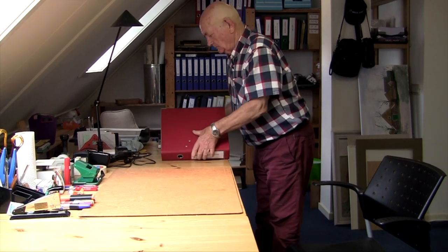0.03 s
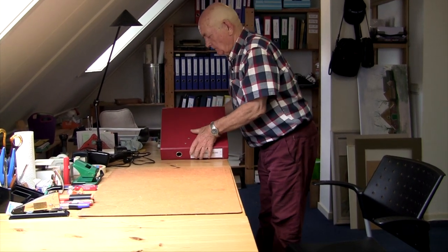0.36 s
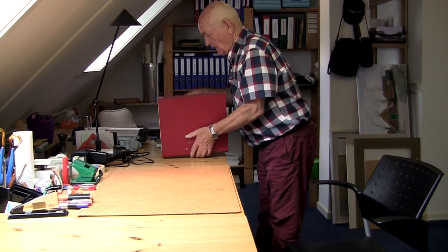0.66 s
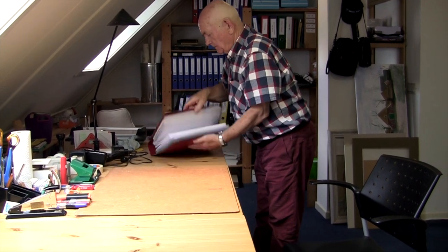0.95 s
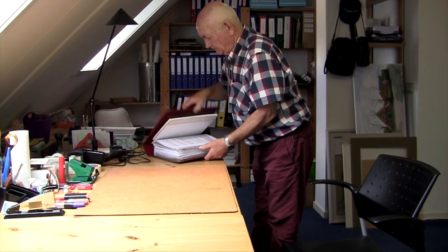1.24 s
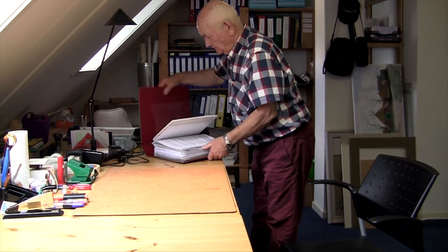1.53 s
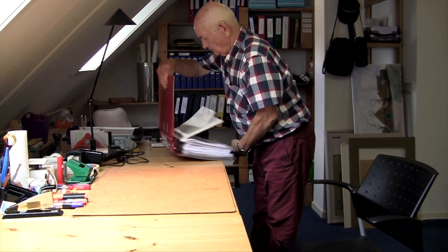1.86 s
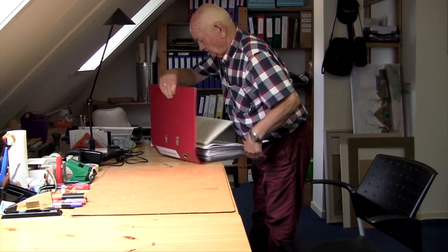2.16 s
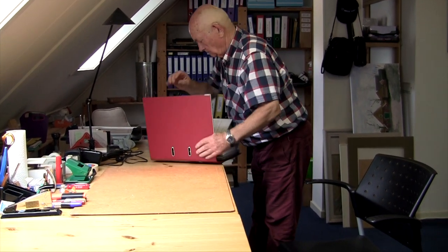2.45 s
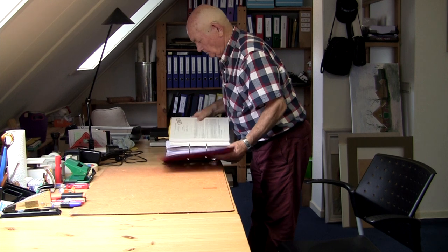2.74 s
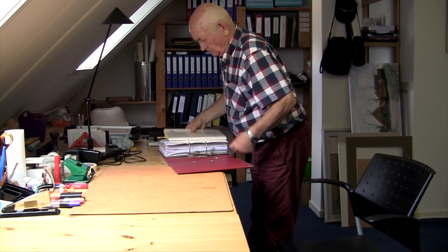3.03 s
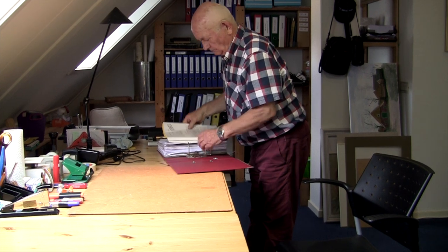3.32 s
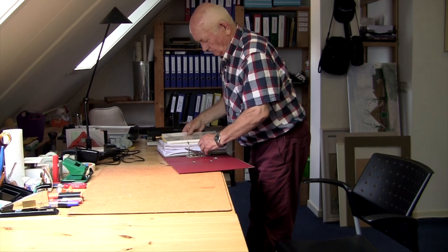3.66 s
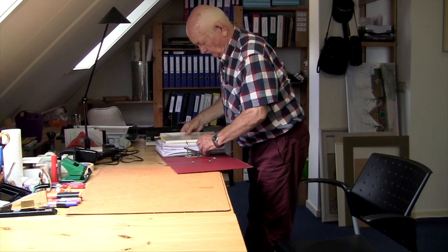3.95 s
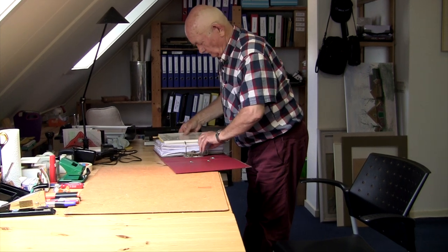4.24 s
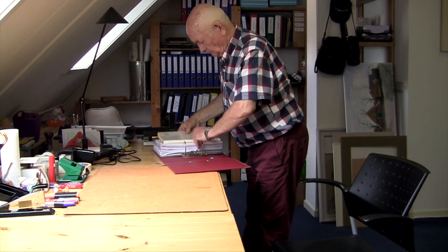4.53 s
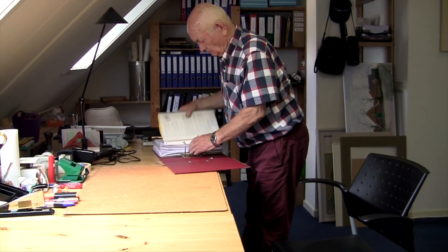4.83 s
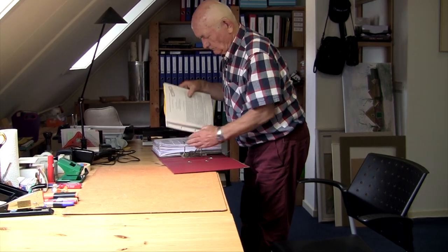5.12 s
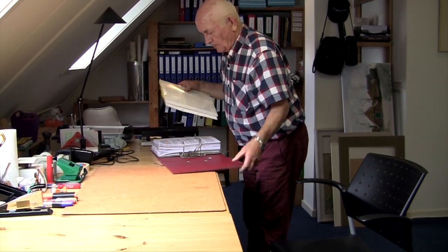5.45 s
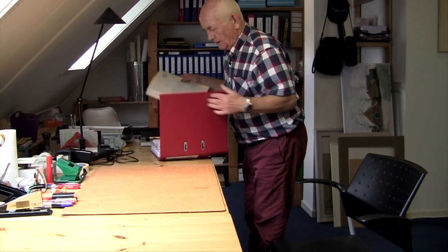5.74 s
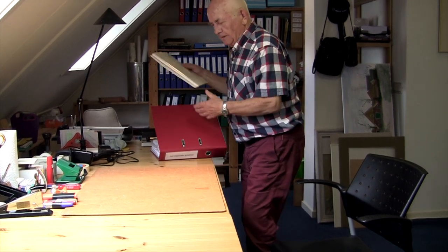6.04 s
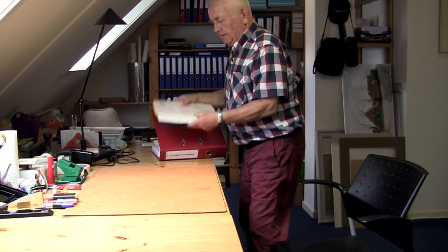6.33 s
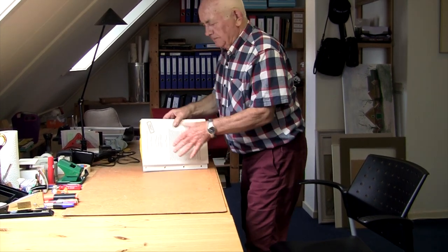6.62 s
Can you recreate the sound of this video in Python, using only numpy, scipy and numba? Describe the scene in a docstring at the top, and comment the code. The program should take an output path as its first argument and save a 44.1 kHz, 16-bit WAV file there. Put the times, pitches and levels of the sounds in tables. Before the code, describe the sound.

A full ring binder scrapes and tips onto a wooden table with a cluster of clacks and thumps. A sharp knock follows, then a quieter stretch of small metal clicks as the clamp and lever are released. Paper rustles, the cover falls shut with a hollow knock, and sheets are tapped on the table. The sound is nearly mono, with the short echo of a small room.

```python
"""Cardboard scrapes and paper hisses as a full ring binder is lifted and tipped onto a wooden table.
Its covers clack and thump the table top, its wire rings click, and sheets buckle in quick crackles.
The binder is opened, the sprung clamp and the steel lever snap free, and paper is stood on its edge.
Near the end the cover falls shut and the hollow binder rings. A small furnished room echoes it all."""
import sys
import numpy as np
from scipy import signal
from scipy.fft import rfft, irfft, next_fast_len
from scipy.io import wavfile
from scipy.ndimage import uniform_filter1d
from numba import njit

SR = 44100
rng = np.random.default_rng(int(sys.argv[2]) if len(sys.argv) > 2 else 0)


def to_wav(sig):
    """Store sig (one row per channel, or 1-D mono) as 16-bit WAV at the path in sys.argv[1].

    Samples outside -1..1 are clipped; the rate is SR.
    """
    pcm = np.clip(np.atleast_2d(sig), -1, 1) * 32767
    pcm = np.round(pcm).astype(np.int16)
    wavfile.write(sys.argv[1], SR, pcm.T)  # frames by channels


N = 303361


def undb(db):
    """Decibels to gain."""
    return 10 ** (np.asarray(db) / 20)


def clock(seconds):
    """Sample times in seconds."""
    return np.arange(int(seconds * SR)) / SR


def level(x, db, first_s=None):
    """Scale to an rms level, over the whole sound or its first moments."""
    head = x if first_s is None else x[:int(first_s * SR)]
    return x * undb(db) / np.sqrt(np.mean(head ** 2) + 1e-20)


def add(track, start_s, x):
    """Mix a sound into a track."""
    i = max(int(start_s * SR), 0)
    track[i:i + len(x)] += x[:max(N - i, 0)]


def band(x, lo_hz, hi_hz, order=2):
    """Causal band-pass."""
    return signal.sosfilt(signal.butter(order, [lo_hz, hi_hz], "band", fs=SR, output="sos"), x)


def colour(x, points):
    """Shape a spectrum by (Hz, dB) points."""
    hz, db = np.transpose(points)
    size = next_fast_len(len(x))
    bin_hz = np.arange(size // 2 + 1) * SR / size
    gain = undb(np.interp(np.log(bin_hz + 1), np.log(hz), db))
    return irfft(rfft(x, size) * gain, size)[:len(x)]


def fade(t, t60_s):
    """Exponential decay."""
    return undb(-60 * t / t60_s)


def mode(t, hz, t60_s):
    """One damped sine."""
    return np.sin(2 * np.pi * hz * t) * fade(t, t60_s)


def struck(modes, db):
    """A body rings in its own modes after a blow."""
    t = clock(0.3)
    ringing = sum(undb(mode_db) * mode(t, hz, t60_s) for hz, mode_db, t60_s in modes)
    return level(ringing, db, first_s=0.0062)


def wander(rate_hz):
    """Smooth random drift, spread near 1."""
    hold = int(SR / rate_hz)
    steps = np.repeat(rng.standard_normal(N // hold + 1), hold)
    return uniform_filter1d(steps, hold)[:N]


def grains(size, per_s, spread_db):
    """Tiny slips of fibres: random clicks, a few much bigger than the rest."""
    slips = (rng.random(size) < per_s / SR) * rng.standard_normal(size)
    return slips * undb(spread_db * np.minimum(rng.exponential(1, size), 4))


@njit
def resonate(x, hz, damping):
    """State-variable band-pass with a moving centre."""
    y, band_state, low_state = np.empty(len(x)), 0., 0.
    for i in range(len(x)):
        g = np.tan(np.pi * hz[i] / SR)
        passed = (band_state + g * (x[i] - low_state)) / (1 + g * (g + damping))
        band_state = 2 * passed - band_state
        low_state += 2 * g * passed
        y[i] = damping * passed
    return y


def stroke(start_s, length_s, rise_share=0.4, sag_db=-5.5):
    """Gain of one sliding stroke: it speeds up, slackens and dies away when the hand stops."""
    t = np.arange(N) / SR - start_s
    progress = np.clip(t / length_s, 0, 1)
    rise = np.sin(np.pi / 2 * np.minimum(progress / rise_share, 1)) ** 2
    release = fade(np.clip(t - length_s, 0, 1), t60_s=0.11)
    return rise * undb(sag_db * progress) * release


# Friction spectra. Each row: frequency in Hz, gain in dB.
SCRAPE_SPECTRUM = [(60, -19), (150, -5), (250, -3), (500, 4), (800, 6), (1400, -1), (2200, -3),
                   (3200, -9.5), (5000, -24), (9000, -88)]
HISS_SPECTRUM = [(800, -30), (2000, 8.5), (3200, 6), (5000, -2.5), (8000, -11.5), (12000, -34.5),
                 (16000, -46)]
# Sliding strokes. Each row: start in seconds, length in seconds, scrape gain in dB, hiss gain in dB,
# cover resonance in Hz.
STROKES = [(-0.08, 0.26, -37.5, -45.5, 1470), (0.432, 0.092, -36.5, -53, 1320),
           (0.487, 0.076, -26.5, -66, 1230), (0.594, .12, -34.5, -38.5, 1150), (0.698, .19, -33, -42, 1090),
           (0.912, 0.29, -26.5, -40, 940), (1.287, 0.11, -34, -40.5, 1120),
           (1.61, 0.34, -39.5, -43.5, 1360), (1.944, 0.08, -22, -35.5, 1330),
           (2.198, 0.065, -40, -44, 1560), (2.275, 0.084, -35.5, -38.5, 1660),
           (2.29, 0.27, -40.5, -44, 1570), (2.58, 0.33, -40.5, -43, 1370), (2.837, 0.097, -36, -42.5, 1330),
           (2.915, 0.2, -42, -46.5, 1360), (3.15, 0.05, -41, -47, 1340), (3.44, .11, -41.5, -49, 1270),
           (3.525, 0.27, -48, -62, 990), (4.06, 0.019, -46.5, -77, 1400), (4.17, .06, -50.5, -64, 1400),
           (4.271, .05, -38, -52, 2010), (4.414, 0.061, -37, -46, 1900), (4.686, 0.31, -48.5, -67, 1400),
           (4.937, 0.059, -35, -38.5, 990), (5.036, .16, -37.5, -43.5, 1000),
           (5.378, 0.11, -33.5, -41.5, 1670), (5.527, 0.047, -34, -38.5, 1460),
           (5.674, 0.28, -42, -49, 1060), (5.738, 0.075, -25.5, -39, 1400), (5.782, 0.062, -30, -49, 810),
           (6.093, 0.05, -31, -31.5, 736), (6.303, 0.081, -31, -38.5, 940),
           (6.453, 0.031, -27, -40.5, 1060), (6.549, 0.034, -30.5, -44, 1260), (6.73, 0.13, -26, -37, 1450)]


def sliding(rest_scrape_db=-61, rest_hiss_db=-74, judder_db=3.0, damping=0.75):
    """Cardboard scrapes through the cover's resonance and paper hisses, both catching and letting go."""
    start_s, length_s, scrape_db, hiss_db, cover_hz = np.transpose(STROKES)
    power = np.array([stroke(*span) for span in zip(start_s, length_s)]) ** 2
    scrape_gain = np.sqrt(undb(scrape_db) ** 2 @ power + undb(rest_scrape_db) ** 2)
    hiss_gain = np.sqrt(undb(hiss_db) ** 2 @ power + undb(rest_hiss_db) ** 2)
    catch_db = judder_db * wander(90)
    hz = np.interp(np.arange(N) / SR, start_s + length_s / 2, cover_hz)
    cover = resonate(grains(N, 7000, 2.3), hz, damping)
    cover = resonate(cover, hz, damping) / np.sqrt(hz)
    scrape = colour(grains(N, 4000, 3.76), SCRAPE_SPECTRUM)
    hiss = colour(grains(N, 9000, 1.7), HISS_SPECTRUM)
    crackle = band(grains(N, 150, 2), 1540, 5540)
    cardboard = level(scrape, -5) + level(cover, -5)
    paper = level(hiss, 0) + level(crackle, -9)
    return cardboard * scrape_gain * undb(catch_db) + paper * hiss_gain * undb(catch_db / 2)


# Still room. Each row: frequency in Hz, gain in dB.
AIR_SPECTRUM = [(25, 6), (60, 0.5), (120, 3), (220, 8.5), (500, 2.5), (1200, -0.5), (2500, -0.5),
                (5000, -9), (10000, -19.5), (16000, -27)]


def room_air(db=-53):
    """Faint, dark room noise whose level wavers."""
    return level(colour(rng.standard_normal(N), AIR_SPECTRUM), db) * undb(wander(6.7))


# Ring mechanism and stiff edges. Each row: start in seconds, ring level in dB, pitch in Hz,
# tick level in dB, ring t60 in seconds.
RING_CLICKS = [(.033, -31.5, 2800, -50, 0.0043), (.133, -37.5, 2540, -45.5, 0.012),
               (.975, -43, 6160, -32.5, .005), (1.3226, -28.5, 4880, -29, 0.0013),
               (1.9425, -14, 2370, -52, 0.012), (2.4956, -26.5, 3410, -44, 0.0051),
               (2.584, -37, 3500, -62, 0.01), (3.177, -38.5, 2180, -58, 0.0055),
               (3.3065, -31.5, 3040, -44, 0.0073), (3.514, -29.5, 2250, -38, 0.018),
               (3.622, -39.5, 2480, -44, 0.012), (3.693, -41, 2550, -45, 0.0066),
               (3.852, -40.5, 2540, -53, 0.0032), (4.272, -27.5, 2800, -38, 0.0084),
               (4.6405, -33, 1770, -47.5, 0.009), (4.906, -42.5, 3420, -51, .008),
               (5.518, -37.5, 2530, -52, 0.0039)]


def ring_click(ring_db, hz, tick_db, t60_s):
    """A wire ring snaps against its mate: two damped modes, a dry snap and a bright tick."""
    t = clock(0.2)
    seating = 1 - np.exp(-t / 0.00035)  # the wire rubs briefly before it seats
    metal = mode(t, hz, t60_s) + undb(-15) * mode(t, 1.45 * hz, t60_s / 2)
    snap = band(rng.standard_normal(len(t)), 0.55 * hz, 1.4 * hz, order=4) * fade(t, 0.026)
    tick = band(rng.standard_normal(len(t)), 3470, 8650, order=3) * fade(t, 0.03)
    return (level(metal * seating, ring_db, first_s=0.0017)
            + level(snap * seating, ring_db - 4, first_s=0.0091)
            + level(tick * seating, tick_db, first_s=0.0028))


# Hands and binder on the table. Each row: start in seconds, level in dB, pitch in Hz.
BUMPS = [(.074, -43.5, 197), (0.345, -44, 227), (.454, -40.5, 204), (.575, -41, 220), (.932, -30.5, 223),
         (.96, -48, 106), (1.055, -42, 234), (1.075, -41, 50), (1.129, -43, 143), (1.188, -34.5, 214),
         (1.956, -30.5, 310), (2.512, -39.5, 199), (3.222, -54, 282), (3.76, -41.5, 210), (5.01, -35, 294),
         (5.244, -42, 186), (5.28, -50.5, 140), (5.437, -48, 242), (5.54, -37, 138), (5.559, -44, 240),
         (6.002, -32, 320), (6.09, -48, 60), (6.659, -47, 122), (6.745, -34, 216), (6.76, -41, 109)]


def bump(db, hz, t60_s=0.065, push_s=0.0019):
    """A soft contact pushes slowly, so only a low mode answers."""
    t = clock(0.2)
    return level(mode(t, hz, t60_s) * (1 - np.exp(-t / push_s)), db, first_s=0.011)


# Cover modes. Each row: ratio to the clack pitch, gain in dB.
COVER_MODES = [(.42, -16), (.73, -2), (1, 8.5), (1.27, -2), (1.7, -10), (2.35, -18)]
# Table top under the binder. Each row: frequency in Hz, gain in dB, t60 in seconds.
TABLE_MODES = [(122, -13.5, 0.072), (177, -19, 0.054), (216, -5.5, 0.084), (233, -2, 0.043),
               (307, 1, 0.034), (381, 1, 0.028), (501, -3, 0.084), (553, -3.5, 0.036), (700, -10.5, 0.044)]
# Covers, spine and paper block hitting wood. Each row: start in seconds, clack level in dB,
# clack pitch in Hz, clack t60 in seconds, thump level in dB, crack level in dB, room send in dB.
KNOCKS = [(0.1753, -25.5, 1140, 0.0095, -42.5, -47, -4), (0.279, -35.5, 830, 0.021, -38.5, -65, -1),
          (.409, -40.5, 1100, 0.0078, -55, -62, 0), (0.642, -27.5, 1000, 0.0034, -31.5, -46, 0.5),
          (0.713, -33, 734, 0.0092, -48, -40, 5), (0.816, -16, 863, 0.021, -49, -27, -4.5),
          (0.867, -25.5, 1320, 0.013, -44, -55, -7), (0.93, -25.5, 890, 0.014, -31, -36, -3.5),
          (1.01, -25.5, 1120, 0.0052, -29, -37, 4.5), (1.0322, -12, 1430, 0.0049, -23, -49, -7),
          (1.046, -13.5, 1040, 0.022, -22.5, -39, -2.5), (1.056, -13.5, 1150, 0.05, -41, -22, -28),
          (1.083, -17, 704, 0.011, -40, -29, -14), (1.114, -24, 850, 0.0049, -40, -42, 2),
          (1.175, -27, 1060, 0.0057, -24.5, -27, -3), (1.9406, -8, 1405, 0.023, -26.5, -34, -3),
          (2.507, -30, 690, 0.0014, -38.5, -40, -1.5), (2.606, -30, 1270, 0.0034, -61, -40, 0.5),
          (2.677, -35.5, 1190, 0.0082, -48, -62, 3), (3.423, -42, 1040, 0.019, -51, -57, 6),
          (3.753, -32, 920, 0.0051, -38.5, -47, 0), (4.274, -45, 805, 0.011, -48.5, -55, 2),
          (4.772, -39, 638, 0.012, -37, -52, -2.5), (4.949, -29, 1440, 0.003, -44, -45, -1.5),
          (4.984, -33, 2080, 0.0091, -39, -60, -1), (5.012, -29, 593, 0.0075, -37, -58, 0),
          (5.105, -23, 1100, 0.018, -32.5, -35, -4.5), (5.545, -31, 1040, 0.0053, -42, -60, -2),
          (5.9986, -14, 1040, 0.0018, -24.5, -32.5, 0.5), (6.032, -21.5, 910, 0.011, -53, -68, -4),
          (6.1097, -14, 1300, 0.0024, -32, -34, -11), (6.3573, -24, 880, 0.0042, -28, -36, -4),
          (6.556, -36, 1080, 0.01, -33.5, -48, -6), (6.7206, -22, 1295, 0.022, -33, -37.5, -3.5),
          (6.742, -14.5, 1226, 0.015, -30, -34, -2.5)]


def knock(clack_db, hz, t60_s, thump_db, crack_db):
    """A damped board clacks, loose sheets chatter on it, the table thumps and the contact cracks."""
    t = clock(0.2)
    board = sum((-1) ** k * undb(db) * mode(t, ratio * hz, t60_s)
                for k, (ratio, db) in enumerate(COVER_MODES))
    chatter = band(rng.standard_normal(len(t)), 497, 2590, order=3)
    chatter *= fade(t, 0.026) * (1 - np.exp(-t / 0.00074))
    clack = level(band(board, 320, 5700), 0, first_s=0.0056) + level(chatter, -9, first_s=0.012)
    wood = np.zeros(len(t))
    for k, (wood_hz, wood_db, wood_t60_s) in enumerate(TABLE_MODES):
        gain = undb(wood_db + 2 * rng.standard_normal())  # each blow lands on another spot
        detune = 1 + 0.043 * rng.standard_normal()
        wood += (-1) ** k * gain * mode(t, wood_hz * detune, wood_t60_s)
    crack = band(rng.standard_normal(len(t)) * fade(t, 0.021), 4300, 6200, order=1)
    return (level(clack, clack_db, first_s=0.0063)
            + level(band(wood, 110, 2100), thump_db, first_s=0.0078)
            + level(band(crack, 2100, 11000), crack_db, first_s=0.0011))


# Sheets buckling and slapping. Each row: start in seconds, length in seconds,
# then body, crisp and fizz levels in dB before the trim.
SHEET_FLICKS = [(0.82, 0.032, -32.5, -41.5, -46.5), (0.939, 0.015, -34.5, -55, -44.5),
                (1.05, 0.012, -19.5, -30.5, -35), (1.096, 0.031, -37, -36.5, -47),
                (1.173, 0.032, -29, -56, -55), (2.062, 0.02, -37, -43, -50.5), (2.995, .02, -45, -52, -64),
                (3.503, 0.016, -34, -37.5, -40), (4.16, 0.022, -47.5, -51, -56.5),
                (4.259, 0.0094, -35.5, -32.5, -48), (4.268, 0.026, -33, -38, -43),
                (4.288, 0.024, -36, -53, -60), (4.426, 0.0093, -35, -44, -68),
                (4.776, 0.012, -32, -43.5, -46), (5.121, 0.026, -32, -36.5, -38),
                (5.405, 0.023, -39, -48, -57), (6.112, 0.022, -24, -35.5, -38.5),
                (6.327, 0.0067, -33.5, -40, -53), (6.464, 0.0051, -39, -42, -55),
                (6.561, 0.053, -40.5, -53, -68), (6.854, 0.017, -39, -47, -49)]


def sheet_flick(length_s, body_db, crisp_db, fizz_db, trim_db=-1):
    """A sheet buckles: a quick swell of crackles in three bands."""
    t = clock(0.2)
    swell = t / length_s * np.exp(-t / length_s * 2.75)
    bands = [(870, 3470, body_db), (2850, 7400, crisp_db), (7300, 12400, fizz_db)]
    return sum(level(band(grains(len(t), 9000, 3.4) * swell, lo_hz, hi_hz), db + trim_db, length_s)
               for lo_hz, hi_hz, db in bands)


# Clamp modes. Each row: frequency in Hz, gain in dB, t60 in seconds.
CLAMP_MODES = [(2920, -6, 0.017), (3100, 0, 0.027), (4210, -4, 0.019), (5470, -6, 0.015),
               (6600, -15, 0.011)]
# Clamp release. Each row: start in seconds, level in dB.
CLAMP_SNAPS = [(3.3095, -30)]


def clamp_snap(db):
    """The sprung paper clamp is released and rings briefly."""
    return struck(CLAMP_MODES, db)


def finger_presses(from_s=3.55, to_s=3.9, scatter_s=0.038, count=6, db=-48.5, hz=190):
    """Fingers working the lever press unevenly on the paper block; returns (start_s, sound) pairs."""
    starts_s = np.linspace(from_s, to_s, count)
    return [(start_s + scatter_s * late, bump(db + 2 * loud, hz * np.exp(0.12 * high)))
            for start_s, (late, loud, high) in zip(starts_s, rng.standard_normal((count, 3)))]


# Lever modes. Each row: frequency in Hz, gain in dB, t60 in seconds.
LEVER_MODES = [(1540, -7, 0.013), (1830, -12, .012), (2400, 4, 0.013), (2500, -2, .016), (2600, -26, 0.14),
               (2770, -25, .06), (3400, -17, 0.077)]
# Lever release. Each row: start in seconds, level in dB.
LEVER_SNAPS = [(4.6405, -27.5)]


def lever_snap(db):
    """The lever's steel arch springs free and rings."""
    return struck(LEVER_MODES, db)


# Modes of the hollow binder. Each row: frequency in Hz, gain in dB, t60 in seconds.
HOLLOW_MODES = [(495, -4.5, 0.29), (563, -3.5, 0.11), (664, -3, 0.12), (786, -0.5, 0.096)]
# Cover landings. Each row: start in seconds, level in dB.
COVER_SHUTS = [(5.9995, -38), (6.111, -21.5)]


def cover_shut(db):
    """The cover falls shut and the hollow binder resonates."""
    return struck(HOLLOW_MODES, db)


# Room decay. Each row: band frequency in Hz, t60 in seconds, gain in dB.
ROOM_BANDS = [(100, 0.58, -2), (246, 0.4, 1.5), (603, 0.46, 0), (1360, 0.41, 0), (3020, 0.42, -3),
              (5900, 0.36, -3), (12700, 0.23, -1)]


def room_tail(onset_s=0.007):
    """Separate early echoes merge into a dense tail; the treble dies first."""
    t = clock(0.7)
    band_hz, band_t60_s, band_db = np.transpose(ROOM_BANDS)
    echoes = rng.standard_normal(len(t))
    echoes *= undb(3.0 * np.exp(-t / 0.032) * rng.standard_normal(len(t)))  # early ones stand out
    spectrum = rfft(echoes / np.sqrt(uniform_filter1d(echoes ** 2, size=400)))
    log_hz = np.log(np.arange(len(spectrum)) * SR / len(t) + 1)
    tail = np.zeros(len(t))
    for selector, t60_s, db in zip(np.eye(len(band_hz)), band_t60_s, band_db):
        band_echoes = irfft(spectrum * np.interp(log_hz, np.log(band_hz), selector), len(t))
        envelope = fade(t, t60_s) * (1 - np.exp(-(t / onset_s) ** 2))
        tail += band_echoes * envelope * undb(db) / np.sqrt(np.sum(envelope ** 2))
    return tail


def room_echoes(sounds, spot_count=5):
    """Sounds are dealt in turn to spots on the table, each with its own echo pattern."""
    spots = np.zeros((spot_count, N))
    for k, (start_s, x, send_db) in enumerate(sounds):
        add(spots[k % spot_count], start_s, x * undb(send_db))
    return sum(signal.oaconvolve(spot, room_tail())[:N] for spot in spots)


def scene(bounce_s=0.001147, bounce_gain=0.023, side_db=-48):
    """The binder's sounds, their bounce off the table top, the room and its air; nearly mono."""
    sounds = [(0.00027, sliding(), 0)]  # start in seconds, sound, room send in dB
    sources = [(BUMPS, bump), (RING_CLICKS, ring_click), (SHEET_FLICKS, sheet_flick),
               (LEVER_SNAPS, lever_snap), (CLAMP_SNAPS, clamp_snap), (COVER_SHUTS, cover_shut)]
    for rows, source in sources:
        sounds += [(start_s, source(*settings), 0) for start_s, *settings in rows]
    sounds += [(start_s, x, 0) for start_s, x in finger_presses()]
    # a flat cover radiates at the microphone or at the walls, so the send varies
    sounds += [(start_s, knock(*settings), send_db) for start_s, *settings, send_db in KNOCKS]
    direct = np.zeros(N)
    for start_s, x, _ in sounds:
        add(direct, start_s, x)
        add(direct, start_s + bounce_s, bounce_gain * x)
    echoes = room_echoes(sounds)
    mid = direct + echoes + room_air()
    side = np.zeros(N)
    add(side, 0.01, undb(side_db) * echoes)
    return np.array([mid + side, mid - side])


def record(dry, hiss_db=-69, ceiling=0.92, top_hz=15750):
    """The microphone rounds the highest peaks and adds faint hiss; the top is cut."""
    hiss = undb(hiss_db) * rng.standard_normal(dry.shape)
    rounded = dry / (1 + (dry / ceiling) ** 4) ** 0.25
    return signal.sosfilt(signal.ellip(10, 0.2, 80, top_hz, fs=SR, output="sos"), rounded + hiss)


dry = scene()
out = record(dry)
to_wav(out)
```